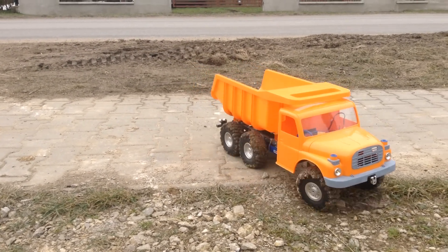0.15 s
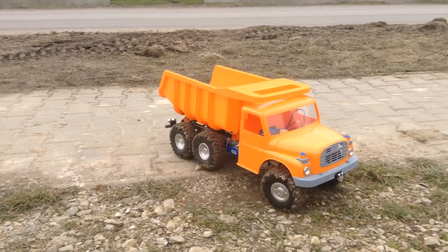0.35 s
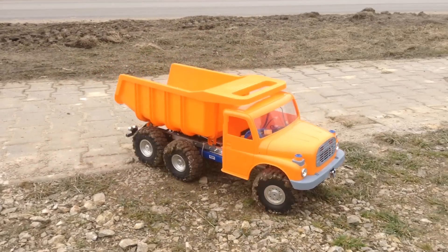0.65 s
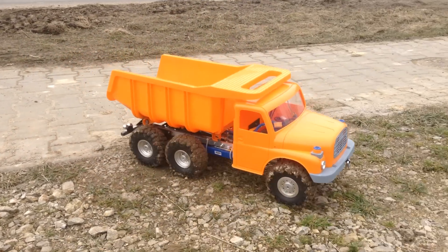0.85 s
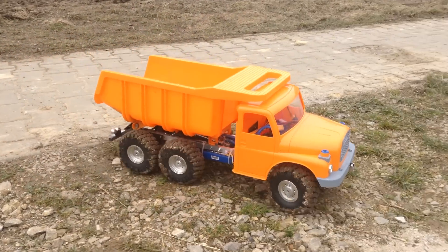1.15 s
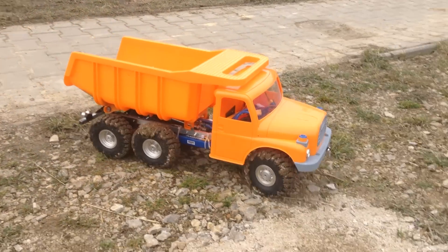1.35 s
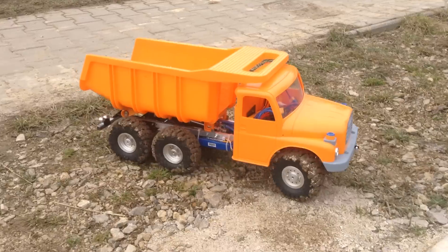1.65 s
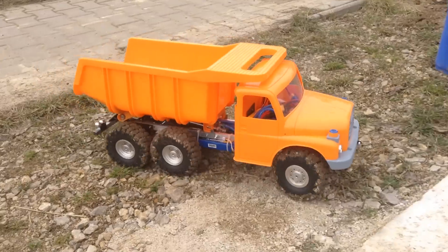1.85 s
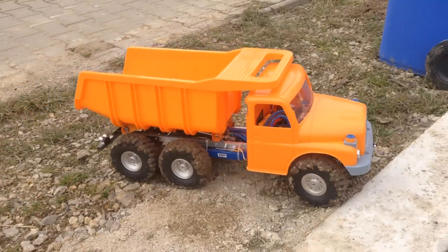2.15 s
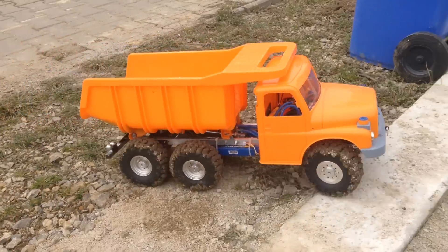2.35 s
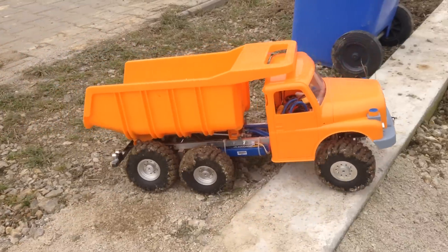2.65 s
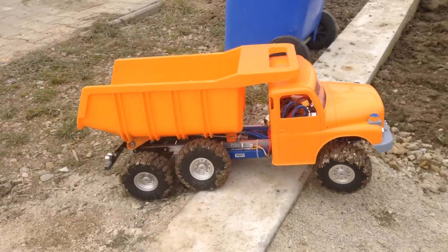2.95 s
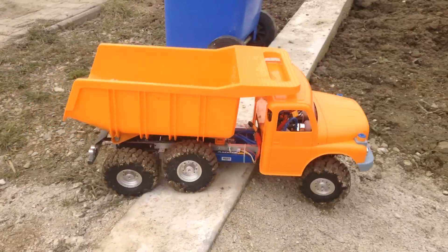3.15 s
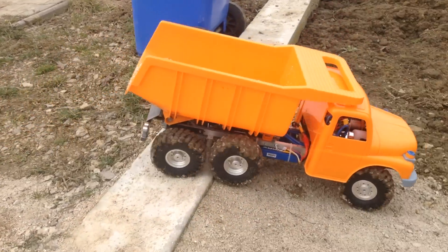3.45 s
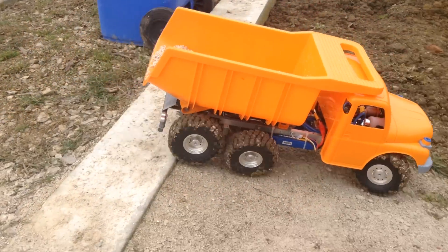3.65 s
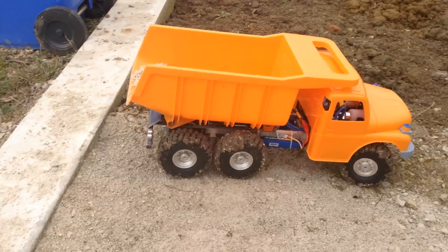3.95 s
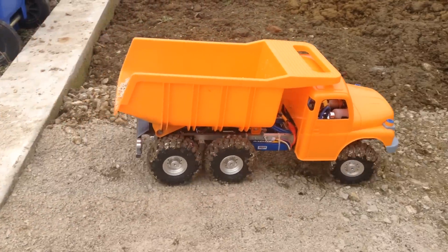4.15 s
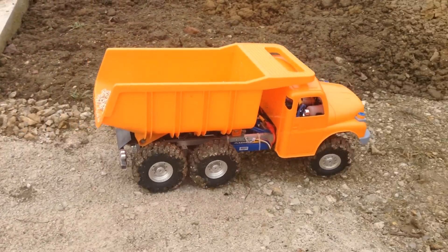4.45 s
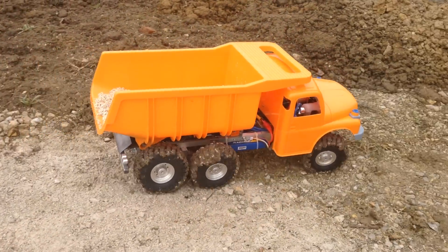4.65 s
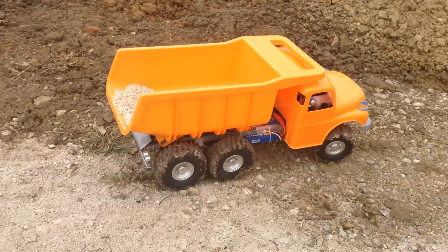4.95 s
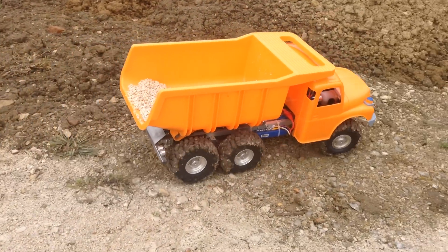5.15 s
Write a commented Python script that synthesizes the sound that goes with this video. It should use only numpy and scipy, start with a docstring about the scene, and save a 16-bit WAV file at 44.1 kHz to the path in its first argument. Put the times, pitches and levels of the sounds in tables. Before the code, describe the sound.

Outdoors, close microphone: a small electric toy truck approaches over loose stones with a thin, wavering gear whine and plastic body rattle. Wheels bump and stones tick. It gets abruptly louder and brighter at the kerb, the motor straining lower, then recovers pitch and runs on nearby. Three hard, loud snaps cut through in the second half.

```python
"""Toy truck on gravel

A small electric toy truck crawls over gravel and a concrete kerb, coming close to the microphone, outdoors.
Sine tones make the whine, which follows motor speed, and the speed controller's fixed note.
Filtered noise makes the rasp, the drumming plastic body and the scrubbing tyres; stones tick, wheels bump.
Three of the sharp snaps are loud enough to make a limiter duck."""
import sys
import numpy as np
from scipy import signal
from scipy.fft import rfft, irfft, next_fast_len
from scipy.io import wavfile
from scipy.ndimage import minimum_filter1d, map_coordinates

SR = 44100
rng = np.random.default_rng(int(sys.argv[2]) if len(sys.argv) > 2 else 0)


def unload_wav(signal):
    """Save mono or channel-first audio to the path in sys.argv[1] as 16-bit WAV at rate SR, clipped to [-1, 1]."""
    wavfile.write(
        sys.argv[1],
        SR,
        np.round(np.clip(np.atleast_2d(signal).T, -1, 1) * 32767).astype(np.int16),
    )


N = 233974

TEETH = 15  # on the pinion: tooth rate = 15 x shaft rate
# how far the truck shows its open side, close by over hard ground: time_s, share (0-1)
OPENING = [(1.9, 0.01), (2.6, 0.58), (3.4, 0.82), (4.2, 1)]


def amp(db):
    """Turn decibels into gain."""
    return 10 ** (np.asarray(db) / 20)


def unit(x):
    """Scale to rms 1."""
    return x / np.sqrt(np.mean(x ** 2) + 1e-20)


def curves(rows):
    """Draw straight lines between rows: one value per sample for each column after the time."""
    seconds, *columns = np.transpose(rows)
    return [np.interp(np.arange(N) / SR, seconds, column) for column in columns]


def swells(rows):
    """Add up a bell-shaped change in dB for each row of middle_s, half_length_s, change_db."""
    t = np.arange(N) / SR
    return sum(db * np.exp(-((t - middle) / half) ** 2) for middle, half, db in rows)


def wobble(rate):
    """A smooth random curve through `rate` random points a second."""
    points = rng.standard_normal(int(N * rate / SR) + 4)
    return map_coordinates(points, [np.arange(N) * rate / SR])


def lagging(x, seconds):
    """A control curve that follows x late, as its running mean."""
    width = max(int(seconds * SR), 1)
    total = np.cumsum(np.concatenate([np.full(width, x[0]), x]))
    return (total[width:] - total[:-width]) / width


def angle(hz):
    """Running phase of a changing frequency, in radians."""
    return 2 * np.pi * np.cumsum(hz) / SR


def filtered(x, response):
    """Multiply the spectrum of x by a response of frequency."""
    m = next_fast_len(N + SR // 2)
    return irfft(rfft(x, m) * response(np.fft.rfftfreq(m, 1 / SR)), m)[:N]


def coloured(x, points):
    """Filter x by a curve through (frequency_hz, gain_db) points, then scale to rms 1."""
    f, db = np.transpose(points)
    return unit(filtered(x, lambda hz: amp(np.interp(np.log(hz + 1), np.log(f), db))))


def fuzzy(phase, width):
    """A narrow band of noise that follows a tone's phase; faster wobbling makes it wider."""
    return unit(wobble(width) * np.sin(phase) + wobble(width) * np.cos(phase))


def add(track, s, sound):
    """Mix a short sound into the track at time s (seconds)."""
    part = track[round(s * SR):][:len(sound)]
    part += sound[:len(part)]


def level(law, near_db, load, opening):
    """A part's level in dB: it follows the truck's nearness, the motor's load and the open side."""
    close_db, share, load_db, open_db = law
    return close_db + share * near_db + load_db * load + open_db * opening


def whine(mesh, whine_db, passed, rough=0.34, flicker_db=1.5):
    """The pinion's teeth sing at the tooth rate, with weaker lines at other multiples of the shaft rate."""
    # weaker lines of the drive: shaft_multiple, level_db (against the whine)
    gear_lines = [(14, -19), (16, -17), (30, -18)]
    # lines that escape mostly towards the tail: shaft_multiple, level_db (against the whine)
    side_lines = [(30, -9.5), (39, -12), (40, -12.5)]

    shaft = (mesh + rough * wobble(120)) / TEETH

    def partial(order, db):
        """One line of the drive, its level drifting."""
        return amp(db + 0.89 * wobble(6.3)) * np.sin(order * shaft)

    # the level flickers as the load shifts, less so once the truck has passed
    tone = np.sin(TEETH * shaft) * amp(flicker_db * (1.5 - passed / 2) * wobble(34))
    tone += sum(partial(*line) for line in gear_lines)
    tone += passed * sum(partial(*line) for line in side_lines)
    return amp(whine_db) * np.sqrt(2) * tone


def chatter(mesh, whine_db, slack_db, opening, upper_db=-1, front_db=-5, side_db=1):
    """Slack teeth bounce, and the clean whine breaks up into two rough bands, loudest from the open side."""
    facing_db = front_db + (side_db - front_db) * opening
    sideband = mesh * (TEETH + 1.6) / TEETH
    bands = fuzzy(mesh, width=200) + amp(upper_db) * fuzzy(sideband, width=210)
    slackness = (1 - amp(-slack_db)) ** 3
    return amp(whine_db + facing_db) * slackness * unit(bands)


def gears(mesh, box_db, rasp_db, sizzle_db):
    """Tooth scrapes ring the gearbox; their bright part comes out as the truck shows its open side."""
    # colours of the three noise bands: frequency_hz, gain_db
    gearbox_colour = [(1200, -52), (2100, -3.5), (2450, -1.5), (2750, 0), (3100, 1.5), (3400, 1),
                      (3700, -0.5), (4050, -1.5), (4500, -18), (6000, -89)]
    rasp_colour = [(2500, -70), (3900, -11), (4500, -2), (4900, -0.5), (5300, 2), (5700, 1.5), (6150, 1.5),
                   (6600, -2.5), (7100, -5), (9000, -28.5)]
    sizzle_colour = [(5000, -44), (6800, -9), (7600, -2.5), (8300, 0.5), (9000, -0.5), (9700, -2),
                     (11000, -5.5), (12200, -12), (13400, -10.3), (14200, -21), (15200, -41)]

    flutter_db = 0.75 * wobble(21.84)  # shared by all three bands
    repeating = 0.24 * strands(mesh)
    box_source = scraping(mesh, bite=0.65, uneven_db=2.0) + repeating
    rasp_source = scraping(mesh, bite=0.58, uneven_db=1.5) + repeating
    sizzle_source = scraping(mesh, bite=0.18, uneven_db=1.0) + repeating / 2
    box = amp(box_db + flutter_db - 1.5) * coloured(box_source, gearbox_colour)
    rasp = amp(rasp_db + flutter_db) * coloured(rasp_source, rasp_colour)
    sizzle_flutter_db = flutter_db + 0.71 * wobble(11)
    sizzle = amp(sizzle_db + sizzle_flutter_db) * coloured(sizzle_source, sizzle_colour)
    return box + rasp + sizzle


def scraping(mesh, bite, uneven_db):
    """Each tooth scrapes as it engages: noise that swells once per tooth, with random unevenness."""
    gate = np.abs(1 + bite * np.cos(mesh))
    return rng.standard_normal(N) * gate * amp(uneven_db * wobble(400))


def strands(mesh, drift_db=7.0):
    """Tooth errors of the many gears come round at their own rates: a thicket of lines that swell and waver."""
    shaft = mesh / TEETH

    def slow(count):
        """A random curve with `count` points over the whole sound."""
        return np.interp(np.arange(N), np.linspace(0, N, count), rng.standard_normal(count))

    lines = np.zeros(N)
    for order in range(11, 48):
        ratio = order + rng.random() - 0.5
        gain = amp(drift_db * np.tanh(slow(count=50)))
        lines += gain * np.sin(ratio * shaft + 2 * np.pi * slow(count=70))
    return unit(lines)


def backlash(mesh, backlash_db, opening, passed, uneven_db=2.0):
    """Loose teeth smear the gear lines into rough bands that follow motor speed; each faces its own way."""
    # shaft_multiple, width_hz, front_db, side_db, tail_db (levels heard from each side)
    rough_bands = [(9.19, 200, -18.5, -34, -18.5), (13.06, 260, -16, -42, -13),
                   (15.6, 380, -13, -18.5, -30), (26.85, 300, -31, -23, -30), (29.6, 190, -32, -22, -14),
                   (37.64, 900, -14, -14, -13), (45.9, 380, -20, -10, -30)]
    band_top_hz = 9300  # the gearbox wall lets little through above this

    side = np.minimum(opening / OPENING[1][1], 1)  # fully side-on by the second row
    bands = np.zeros(N)
    for order, width, front_db, side_db, tail_db in rough_bands:
        coming_db = (1 - side) * front_db + side * side_db
        facing_db = (1 - passed) * coming_db + passed * tail_db
        gain = amp(backlash_db + facing_db + uneven_db * wobble(28))
        bands += gain * fuzzy(order * mesh / TEETH, width)
    return filtered(bands, lambda hz: 1 / (1 + (hz / band_top_hz) ** 40))


def grinds(mesh, stutter_db=2.0):
    """Under strain one gear pair after another grinds: a rough, stuttering note that follows the motor."""
    # middle_s, spread_s, shaft_multiple, width_hz, level_db (before a 1.5 dB cut)
    grind_rows = [(0.6, 0.45, 16, 150, -53), (1.58, 0.09, 18.65, 130, -52.5), (2.15, 0.2, 18.7, 160, -53),
                  (2.09, 0.06, 13.4, 150, -48), (2.17, 0.08, 9.2, 120, -44.5), (2.25, 0.04, 14.2, 130, -47),
                  (2.68, 0.11, 13.8, 330, -43.5), (3.07, 0.15, 9, 300, -45), (3.18, 0.1, 4.35, 100, -46),
                  (3.3, 0.035, 4.3, 70, -43), (3.35, 0.14, 15.35, 150, -44), (3.33, 0.13, 17.2, 130, -45),
                  (3.62, 0.12, 16.1, 200, -45.5), (3.62, 0.12, 26, 380, -42), (4.3, 0.3, 15.8, 170, -46.5)]

    t = np.arange(N) / SR
    track = np.zeros(N)
    for middle, spread, order, width, db in grind_rows:
        swell = np.exp(-((t - middle) / spread) ** 2 / 2)
        gain = amp(db - 1.5 + stutter_db * wobble(35))
        track += gain * swell * fuzzy(order * mesh / TEETH, width)
    return track


def controller(overtone_db, fade_db=2.0):
    """Chopped current makes the motor windings sing at a fixed pitch, with a strong fourth harmonic."""
    # level of the fundamental: time_s, level_db
    fundamental_level = [(0, -53), (0.85, -57), (1.1, -50), (1.45, -49), (1.95, -54), (2.15, -49),
                         (2.38, -48), (2.56, -40.5), (2.85, -51), (3.35, -50.5), (3.65, -68), (5.31, -55)]
    # the throttle opens for each axle to climb the kerb and again later, and eases in between;
    # this moves the fourth harmonic: middle_s, half_length_s, change_db
    surges = [(1.98, 0.08, -10), (2.21, 0.03, 4), (2.6, 0.13, 5.5), (2.79, 0.025, -6), (2.92, 0.072, 4.5),
              (3.335, 0.04, 9), (3.66, 0.16, -13), (3.94, 0.05, 7), (4.16, 0.04, 4), (4.38, 0.035, 5),
              (4.7, 0.06, 7.5), (4.87, 0.07, 5), (5.22, 0.1, -6)]
    switch_hz = 1443.6

    low_db, = curves(fundamental_level)
    fourth_db = overtone_db + swells(surges)
    phase = angle(np.full(N, switch_hz))
    low = amp(low_db + fade_db * wobble(12)) * np.sin(phase)
    fourth = amp(fourth_db + fade_db * wobble(12)) * np.sin(4 * phase)
    return low + fourth


def body(mesh, rattle_db, opening, hum_db=-6):
    """The drive shakes the hollow plastic body: a low drumming, a rough gear hum and a loose rattle."""
    # shaking of the body, strongest on the loose stones: time_s, drumming_db
    drumming = [(0, -57), (1.15, -49.5), (2.8, -50.5), (3.02, -56.5), (3.27, -51.5), (3.55, -54.5),
                (4.45, -59.5), (4.8, -53), (5.31, -54.5)]
    # less rattle while the rear wheels roll on smooth concrete: middle_s, half_length_s, change_db
    lulls = [(3.65, 0.071, -2)]
    # colours of the drumming, and of the rattle from front and side: frequency_hz, gain_db
    drum_colour = [(25, -30), (50, -35), (90, -24), (130, -16), (180, -4), (255, 2.5), (310, -4.5),
                   (360, -8), (470, -8.5), (700, -23), (1500, -68)]
    front_colour = [(200, -37), (380, -8), (560, 2), (700, 4), (880, -1.5), (1130, 1), (1330, -3),
                    (1550, 1), (1850, 0.5), (2120, -5), (2800, -3.5), (5000, -27)]
    side_colour = [(200, -31), (310, 1), (440, -9), (600, -4), (800, 4), (950, 1), (1130, 2), (1330, -3.5),
                   (1540, 4), (1850, -1.5), (2080, -2.5), (2800, -23), (5000, -43)]

    drum_db, = curves(drumming)
    drum = coloured(rng.standard_normal(N) * amp(2.7 * wobble(30)), drum_colour)
    slow_gear = mesh / 12
    throb_db = 4 * np.tanh(wobble(27))
    hum = amp(hum_db + throb_db) * np.sin(slow_gear + 2.0 * wobble(35))

    def shake(colour):
        """Unevenly shaken noise in one colour."""
        return coloured(rng.standard_normal(N) * amp(1.5 * wobble(150)), colour)

    # the rattle changes colour as the truck turns from front to side
    rattle = np.sqrt(1 - opening) * shake(front_colour) + np.sqrt(opening) * shake(side_colour)
    return amp(drum_db) * (drum + hum) + amp(rattle_db + swells(lulls)) * rattle


def snaps(edge_hz=8600):
    """Very short, hard cracks made of fast-dying sine rings, the lowest one a slight knock."""
    # loud and small snaps: start_s, peak_db
    snap_rows = [(1.511, -28), (1.529, -30), (2.7693, 0.5), (3.352, -20), (3.6895, -1), (4.058, -31),
                 (4.077, -15), (4.129, -21), (4.177, 0)]
    # rings in each snap, before filtering: pitch_hz, level_db (relative), t60_s (time to fall 60 dB)
    modes = [(450, -28, 0.004), (3040, -3.5, 0.00029), (6170, -23, 0.003), (11300, -22, 0.0012)]

    track, t = np.zeros(N), np.arange(SR // 100) / SR
    ring = sum(amp(db - 60 * t / t60) * np.sin(2 * np.pi * hz * t) for hz, db, t60 in modes)
    edge = np.diff(ring, prepend=0)  # sample-to-sample steps favour the treble
    crack = signal.lfilter(*signal.butter(3, edge_hz, fs=SR), edge)
    for s, db in snap_rows:
        add(track, s, amp(db) * crack / np.abs(crack).max())
    return track


def bumps(attack_s=0.0011, crunch=0.18, crunch_t60_s=0.05):
    """Wheels drop off stones: a short knock; loose parts clatter and gravel crunches with it."""
    # start_s, peak_db, pitch_hz, t60_s (time to fall 60 dB), clatter (share against the knock)
    bump_rows = [(.242, -37.5, 160, 0.035, .2), (.994, -30, 760, 0.0097, .7),
                 (1.0655, -26.5, 1350, 0.014, .3), (1.1355, -24, 300, 0.024, .45),
                 (1.2235, -24, 245, 0.04, .6), (1.311, -36, 229, 0.05, .6), (1.503, -27, 340, 0.024, .4),
                 (1.512, -32, 420, .018, .4), (1.738, -33.5, 620, .02, .7), (1.82, -38.5, 164, 0.09, .2),
                 (2.051, -34, 245, 0.025, .6), (2.760, -29.5, 340, 0.03, .7), (3.766, -33, 620, 0.018, 2),
                 (3.843, -35, 700, 0.05, 4), (3.889, -35, 620, 0.03, 4)]

    track, t = np.zeros(N), np.arange(SR // 8) / SR

    def noise(lo, hi):
        """Noise between two frequencies in Hz, at rms 1."""
        band = signal.butter(2, [lo, hi], "bandpass", fs=SR)
        return unit(signal.lfilter(*band, rng.standard_normal(len(t))))

    for s, db, hz, t60, loose in bump_rows:
        clatter = loose * noise(hz * 0.37, hz * 1.9)
        knock = (np.sin(2 * np.pi * hz * t) + clatter) * amp(-60 * t / t60)
        gravel = crunch * noise(450, 2200) * amp(-60 * t / crunch_t60_s)
        bump = (knock + gravel) * (1 - np.exp(-t / attack_s))
        bump = signal.lfilter(*signal.butter(1, hz / 4, "highpass", fs=SR), bump)
        add(track, s, amp(db) * bump / np.abs(bump).max())
    return track


def skids():
    """A tyre slips on loose stones or the kerb for a moment: a short swell of gritty noise."""
    # start_s, length_s, level_db, centre_hz
    slips = [(0.726, 0.23, -47.5, 1040), (0.967, 0.28, -47.5, 1280), (1.483, 0.057, -49, 6160),
             (1.93, 0.38, -48, 750), (2.068, 0.074, -37.5, 5040), (3.295, .1, -50, 5000),
             (3.8, 0.15, -44, 810)]

    track = np.zeros(N)
    for s, length, db, hz in slips:
        grains = rng.standard_normal(N) * amp(2.2 * wobble(539.5))
        scrape = coloured(grains, [(hz / 4, -40), (hz, 0), (hz * 2, -14), (hz * 4, -45)])
        swell = np.sqrt(np.abs(np.hanning(int(length * SR))))
        add(track, s, amp(db) * swell * scrape[:len(swell)])
    return track


def grit(level_db, count=300, grain_hz=5200, size_db=2.0, cycles=7.9):
    """Small stones tick under the tyres: sine blips a few cycles long, up to an octave around grain_hz."""
    track, t = np.zeros(N), np.arange(200) / SR
    for when, pitch, size in rng.random((count, 3)):
        hz = grain_hz * 2 ** (2 * pitch - 1)
        db = level_db[int(when * N)] + size_db * np.log(size + 0.02)  # bigger stones are louder
        shape = np.exp(-hz * t / cycles) - np.exp(-2 * hz * t)
        add(track, when * N / SR, amp(db) * np.sin(2 * np.pi * hz * t) * shape)
    return track


def shadow_and_dip(x, opening, passed, edge_hz=10000, loss_db=6):
    """The plastic body screens off the top treble from the front; later the ground reflection cuts a dip."""
    # a dip where the ground reflection cancels the sound, once the truck has passed:
    # centre_hz, half_width_hz, loss_db
    tail_dip = (6720, 620, 4.5)

    dip_hz, half_hz, dip_db = tail_dip
    top = filtered(x, lambda hz: 1 - 1 / (1 + (hz / edge_hz) ** 10))
    band = filtered(x, lambda hz: np.exp(-((hz - dip_hz) / half_hz) ** 2))
    screened_top = (1 - amp(-loss_db * (1 - opening))) * top
    cancelled_band = (1 - amp(-dip_db * passed)) * band
    return x - screened_top - cancelled_band


def ground_bounce(x, opening, delay_s=0.001192, strength=0.1):
    """The sound arrives once more off the hard ground, late and duller, which combs its colour."""
    echo = filtered(x, lambda hz: np.exp(-2j * np.pi * hz * delay_s) / (1 + (hz / 5500) ** 2))
    return x + strength * opening * echo


def scene():
    """The whole truck, alike in both channels; nearness, load and the open side steer the drive's levels."""
    # motor speed, sagging as the truck climbs the kerb: time_s, tooth_rate_hz
    motor_speed = [(0, 2750), (0.14, 2925), (0.23, 2905), (0.36, 3060), (0.44, 3015), (0.53, 2990),
                   (0.57, 3045), (0.65, 3015), (0.74, 3075), (0.82, 2980), (1, 3030), (1.15, 3180),
                   (1.29, 2985), (1.45, 2995), (1.55, 3070), (1.75, 3030), (1.96, 2955), (2.1, 3005),
                   (2.45, 2645), (2.59, 2660), (2.7, 2790), (2.88, 2800), (2.98, 2660), (3.07, 2675),
                   (3.17, 2620), (3.27, 2840), (3.46, 2900), (3.65, 3110), (3.8, 3060), (3.98, 3145),
                   (4.2, 3112), (4.62, 3112), (4.7, 3080), (4.76, 2960), (4.84, 2900), (5, 3000),
                   (5.31, 3030)]
    # how loudly the drive arrives as the truck nears and turns: time_s, level_db (against close by)
    nearness = [(0, -18.5), (1.02, -15), (1.12, -13), (2.03, -8.5), (2.11, -2), (2.18, -2), (2.4, 1),
                (2.9, 1.3), (3.06, -2), (3.35, 0.9), (3.5, -1.9), (4.02, 0), (4.32, 1), (5.31, -0.5)]
    # the truck has passed and shows its tail: time_s, share (0-1)
    passing = [(3.6, 0.05), (4.15, 1)]
    # the gearbox rings near two resonances: tooth_rate_hz, change_db (on the whine)
    whine_response = [(2640, 0.5), (2740, 5), (2880, -0.5), (2990, 0.5), (3060, -0.5), (3115, 4.5),
                      (3170, 1.5)]
    # gears run slack as a wheel rolls off an edge and the whine fades: middle_s, half_length_s, drop_db
    slack = [(0, 0.08, 5), (0.36, 0.05, 9), (1.125, 0.05, 17), (1.35, 0.06, 5), (1.63, 0.03, 6),
             (1.89, 0.05, 6), (2.02, 0.05, 8), (2.66, 0.045, 14), (2.85, 0.085, 22), (3.22, 0.04, 8),
             (3.33, 0.1, 14), (3.58, 0.17, 20), (3.85, 0.06, 18), (4.91, 0.04, 3), (5.22, 0.05, 6)]
    # basic level of each part: close_db (close by, running free), share (of the nearness it follows),
    # load_db (change at full load), open_db (change with the side open)
    whine_law = (-45.7, 0.2, -0.5, 1.3)
    gearbox_law = (-37.5, 0.57, -2, 0)
    rasp_law = (-35, 1.0, -0.5, 1.6)
    sizzle_law = (-45.5, 1.07, 8.5, 3)
    backlash_law = (-35.5, 0.8, 3.5, -2.5)
    rattle_law = (-41, 0.3244, -0.2, -2.44)
    overtone_law = (-44.3, 0.85, 5, -3.5)
    free_hz, climb_hz = 3280, 2692  # tooth rate running free (load 0) and climbing (load 1)
    waver = 0.0042  # share by which the motor speed trembles on rough ground, before it eases
    tail_whine_db = 2.2  # the whine is stronger from behind
    sizzle_lag_s = 0.16  # the top treble is the last to clear the cab as the truck turns

    tooth_hz, = curves(motor_speed)
    near_db, = curves(nearness)
    opening, = curves(OPENING)
    passed, = curves(passing)
    load = (free_hz - tooth_hz) / (free_hz - climb_hz)
    tremble = waver * (1 - 0.703 * passed) * wobble(35)  # eases once the truck has passed
    mesh = angle(tooth_hz * (1 + tremble))

    whine_db = level(whine_law, near_db, load, opening)
    whine_db = whine_db + np.interp(tooth_hz, *np.transpose(whine_response))
    box_db = level(gearbox_law, near_db, load, opening)
    rasp_db = level(rasp_law, near_db, load, opening)
    sizzle_db = level(sizzle_law, near_db, load, opening)
    sizzle_db = sizzle_db + lagging(near_db, sizzle_lag_s) - near_db
    backlash_db = level(backlash_law, near_db, load, opening)
    rattle_db = level(rattle_law, near_db, load, opening)
    overtone_db = level(overtone_law, near_db, load, opening)
    slack_db = swells(slack)

    pinion = whine(mesh, whine_db + tail_whine_db * passed - slack_db, passed)
    pinion += chatter(mesh, whine_db, slack_db, opening)
    tones = pinion + grinds(mesh) + controller(overtone_db)
    running = gears(mesh, box_db, rasp_db, sizzle_db) + body(mesh, rattle_db, opening)
    running += backlash(mesh, backlash_db, opening, passed)
    running = ground_bounce(shadow_and_dip(running, opening, passed), opening)
    tyres = grit(rasp_db - 7) + skids() + bumps()
    return np.tile(tones + running + tyres + snaps(), (2, 1))


def record(dry, release_s=0.035, low_cut_hz=85, top_hz=15250):
    """A limiter ducks just ahead of each peak and recovers gradually; then a wind filter and a treble cut."""
    ceiling = 0.73
    over = np.log(np.maximum(np.abs(dry[0]) / ceiling, 1))
    # hold the largest overshoot so far while it dies away; the sum runs on logarithms
    fade = np.arange(N) / SR / release_s
    held = np.exp(np.maximum.accumulate(np.log(over + 1e-12) + fade) - fade)
    gain = minimum_filter1d(np.exp(-held), size=65)  # reaches 32 samples ahead
    wind_filter = signal.butter(2, low_cut_hz, "highpass", fs=SR, output="sos")
    out = signal.sosfilt(wind_filter, dry * gain)
    return np.array([filtered(channel, lambda hz: hz < top_hz) for channel in out])


dry = scene()
out = record(dry)
unload_wav(out)
```